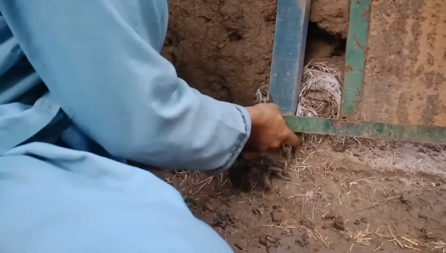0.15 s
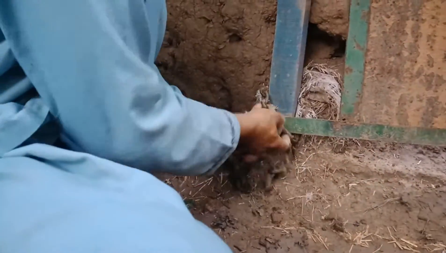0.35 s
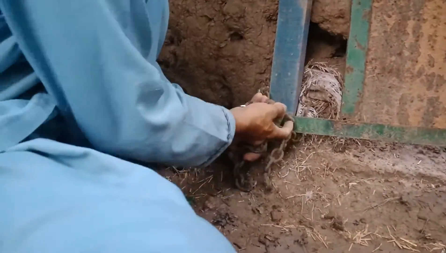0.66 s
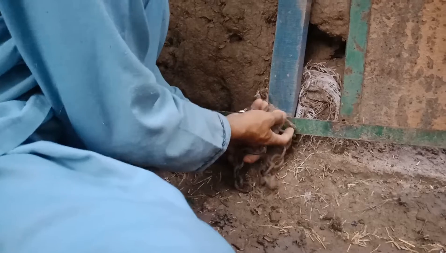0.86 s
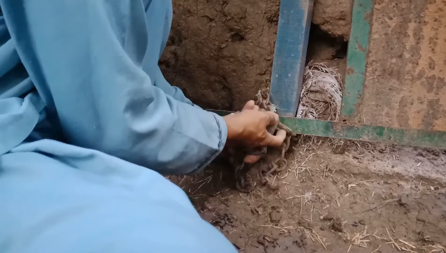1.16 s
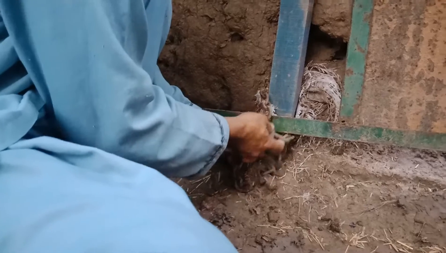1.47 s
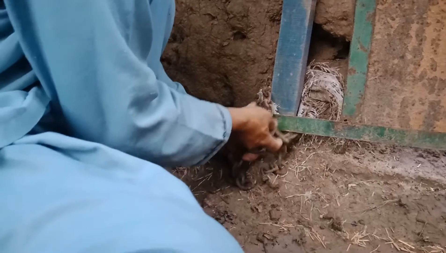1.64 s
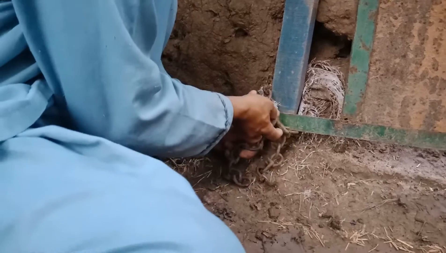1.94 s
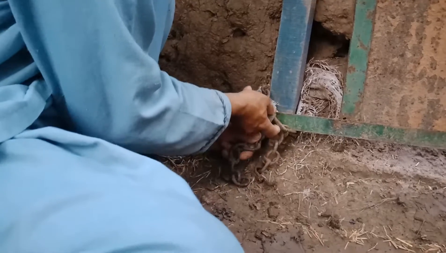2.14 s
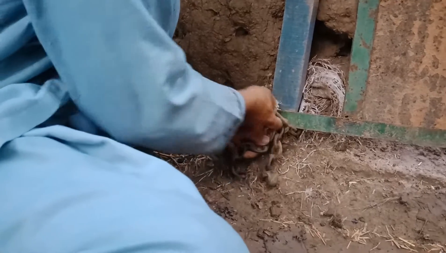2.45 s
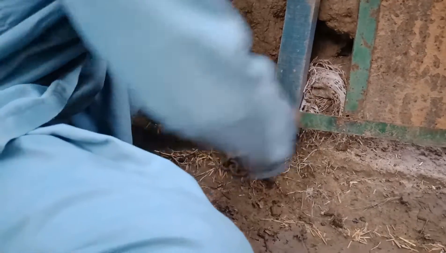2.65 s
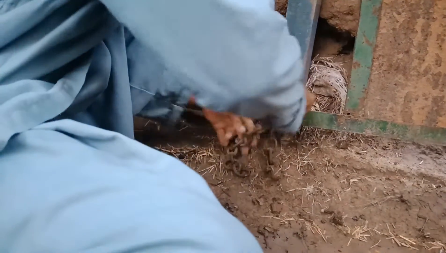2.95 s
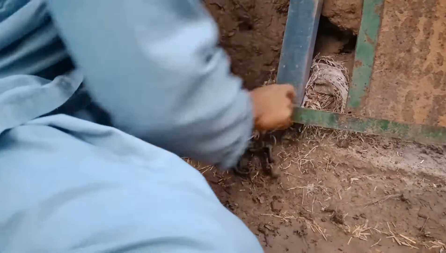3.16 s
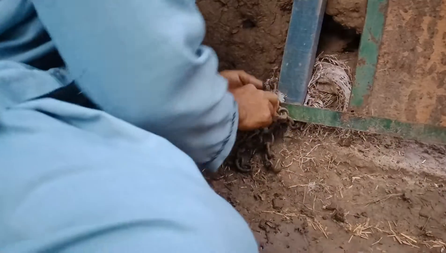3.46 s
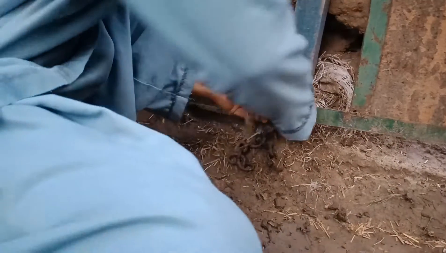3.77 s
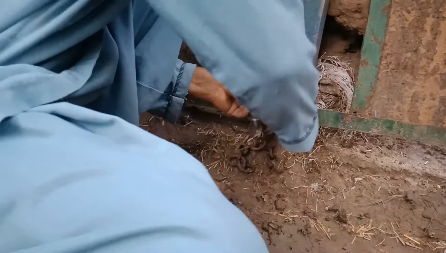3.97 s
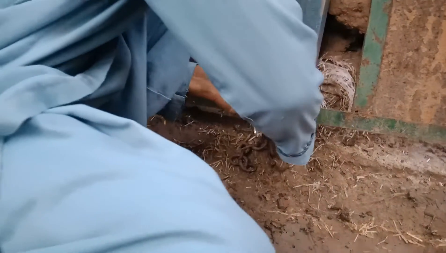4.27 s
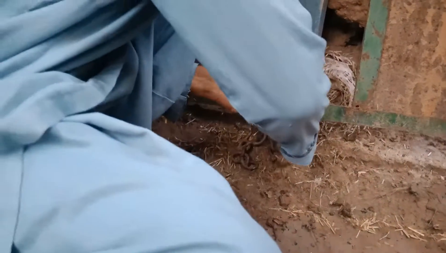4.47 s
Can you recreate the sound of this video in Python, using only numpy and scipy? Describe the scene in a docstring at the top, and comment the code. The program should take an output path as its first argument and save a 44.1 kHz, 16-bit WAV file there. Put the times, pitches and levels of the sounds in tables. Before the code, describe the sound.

Chain links scrape and strike a sheet-metal door frame, each blow ringing short and dull, with small dragging knocks between and a few faint high tinkles. The opening is busy, the middle sparse, then the heaviest clatter comes before activity thins to scattered hits. Steady pulsing crickets lean right behind it in an open yard, with a soft distant hum; near stereo microphone, dry.

```python
"""Hands work an iron chain round the foot of a sheet-metal door in a yard. Links knock the frame, and each blow
excites damped door modes that ring dull and dense. Between blows the dragged chain is a random train of small
knocks into the same modes, and link against link tinkles faintly in a few high modes. Crickets, louder to the
right, are a blur of wing strokes; behind them lie a far motor hum of resonated noise and shaped outdoor air."""
import sys
import numpy as np
from scipy import signal
from scipy.fft import rfft, irfft, next_fast_len
from scipy.io import wavfile
from scipy.ndimage import uniform_filter1d

SR = 44100
rng = np.random.default_rng(int(sys.argv[2]) if len(sys.argv) > 2 else 0)


def generate_wav(sig):
    """Save sig (samples, or channels by samples) to the path in sys.argv[1] as 16-bit PCM at SR."""
    pcm = np.round(np.clip(np.atleast_2d(sig).T, -1, 1) * 32767).astype(np.int16)
    wavfile.write(sys.argv[1], SR, pcm)


N = 203256
TIME = np.arange(N) / SR


def undb(db):
    """Decibel scale: amplitude ratio of a level."""
    return 10 ** (np.asarray(db) / 20)


def read(table, hz):
    """Log-frequency interpolation of a table of (pitch_hz, value)."""
    table_hz, values = np.array(table).T
    return np.interp(np.log(hz), np.log(table_hz), values)


def curves(table):
    """Linear interpolation in time: the columns after start_s, sample by sample."""
    s, *columns = np.transpose(table)
    return [np.interp(TIME, s, column) for column in columns]


def unit(x):
    """Normalization to an RMS of one."""
    return x / np.sqrt(np.mean(x ** 2))


def ring(x, hz, width_hz):
    """Resonance: a second-order peak passes a narrow band of the excitation."""
    b, a = signal.iirpeak(hz, hz / width_hz, SR)
    return signal.lfilter(b, a, x)


def walk(rate):
    """Slow random modulation: random levels held 1 / rate s and smoothed twice."""
    hold = int(SR / rate)
    steps = np.repeat(rng.standard_normal(N // hold + 1), hold)
    return uniform_filter1d(uniform_filter1d(steps, hold), hold)[:N]


def add(out, sound, s):
    """Superposition: mix a sound in from time s."""
    i = int(s * SR)
    out[:, i:i + sound.shape[1]] += sound[:, :N - i]


# spectrum of each of the two noises in the outdoor air: pitch_hz, level_db (per Hz)
AIR_SPECTRUM = [(30, -93), (60, -90), (160, -76), (300, -88), (1000, -101), (4000, -106), (6300, -118),
                (7000, -121), (7600, -112), (8300, -122), (9200, -113), (10500, -118), (15500, -118)]
HUM_HZ, HUM_WIDTH_HZ, HUM_DB = 81.2, 9.2, -56  # the level wavers about HUM_DB


def yard():
    """Spectral shaping and resonance of noise: outdoor air, alike on both sides only in the bass, and motor hum."""
    size = next_fast_len(N, True)
    hz = np.maximum(np.fft.rfftfreq(size, 1 / SR), 1)
    mid, side = rfft(rng.standard_normal((2, size)))
    wide = np.clip(hz / 1500, .25, 1)
    left_right = mid + wide * side * np.array([[1], [-1]])
    air = irfft(undb(read(AIR_SPECTRUM, hz)) * np.sqrt(SR / 2) * left_right, size)[:, :N]
    narrow = ring(rng.standard_normal(N), HUM_HZ, HUM_WIDTH_HZ)
    hum = unit(ring(narrow, HUM_HZ, 33)) * undb(HUM_DB + 3.0 * walk(7))
    return air * undb([[-.3], [.3]]) + hum * undb([[-1.1], [1.1]])


# swells of the cricket chorus, added to the bed: crest_s, level_db, left_minus_right_db
SWELLS = [(.07, -39.5, -9), (.63, -39.5, -9.5), (1.3, -41, -7), (1.88, -39.5, -8.5), (2.501, -41, -8.5),
          (3.03, -41.5, -9.5), (3.62, -42.5, -8.5), (4.328, -41, -10.5), (4.68, -43, -9)]
SWELL_RISE_S, SWELL_FALL_S = 0.11, 0.17
BED_DB, BED_GROWS_DB_PER_S, BED_PAN_DB = -50, 1.15, -10  # singers that never pause; pan is left minus right


def swells():
    """Power summation: quick rises and slower falls of the chorus, left and right, over a slowly growing bed."""
    side = np.array([[.5], [-.5]])
    power = undb(BED_DB + BED_GROWS_DB_PER_S * TIME + side * BED_PAN_DB) ** 2
    for s, db, pan_db in SWELLS:
        width_s = np.where(TIME < s, SWELL_RISE_S, SWELL_FALL_S)
        shape = np.exp(-((TIME - s) / width_s) ** 2)
        power = power + shape * undb(db + side * pan_db) ** 2
    return power


# resonances of the wings: pitch_hz (before the left-right shift), stroke_s (from peak to 1/e),
# level_db (between wings)
WINGS = [(4760, 0.0017, -7), (5156, 0.0011, 12.5), (5318, 0.0016, 5), (5560, 0.0014, -1.5)]


def crickets(rate=4000, throb_db=-0.43):
    """Stochastic superposition: random wing strokes blur, unrelated left and right, and throb a little."""
    t, out = TIME[:600] - TIME[300], []
    for side, power in zip((1, -1), swells()):
        song = 0
        for hz, stroke, wing_db in WINGS:
            strokes = (rng.random(N) < rate / SR) * rng.standard_normal(N)
            shifted_hz = hz * (1 + 0.0047 * side)  # the left singers sit higher
            burst = np.exp(-(t / stroke) ** 2) * np.sin(2 * np.pi * shifted_hz * t)
            song = song + undb(wing_db) * signal.oaconvolve(strokes, burst, "same")
        out.append(unit(song) * np.sqrt(power) * undb(throb_db * walk(45)))
    return np.array(out)


# touches of link on link: start_s, level_db (before the mode levels), upper_db (added above the lowest mode)
TINKS = [(.131, -76, -2), (.204, -70, -4), (.247, -64, -6), (.633, -52, -7), (3.688, -66, -2),
         (3.71, -70, 4), (3.722, -66, 4), (3.765, -74, 2)]
# modes of a free link: pitch_hz (before detuning), level_db (between modes), t60_s
LINK_MODES = [(7960, 20, 0.07), (9800, -3, 0.07), (10950, 0.5, 0.14), (14900, -8, .12)]


def tinks():
    """Free vibration of small bodies: two links touch and ring in a few high, slightly detuned modes."""
    out, t = np.zeros((2, N)), TIME[:SR // 4]
    lowest_hz = LINK_MODES[0][0]
    for s, db, upper_db in TINKS:
        sound = 0
        scatter = rng.standard_normal((len(LINK_MODES), 2, 1))
        for (hz, mode_db, t60), z in zip(LINK_MODES, scatter):
            size = undb(db + mode_db + upper_db * (hz > lowest_hz) + 3.6 * z[::-1])
            wave = np.sin(2 * np.pi * hz * (1 + 0.0047 * z[0]) * t + z)
            sound = sound + size * wave * np.exp(-np.log(1000) * t / t60)
        add(out, sound * (1 - np.exp(-t / 0.008)), s)
    return out * undb(5.3 * walk(120))  # random level swings make the tinkling ragged


# strong modes of the door: pitch_hz, level_db (before DOOR_DB), t60_s (before the hand's damping)
DOOR_MODES = [(215.3, 10.5, 0.15), (439.5, -2, 0.25), (515, -6, 1.1), (638, -10, .3), (775.4, 3.5, 0.082),
              (871, -6, 0.12), (1015, -12, .45), (1255, -11, .35), (1321, -5.5, 0.31), (1368, -18, 1.2),
              (1520, -10.5, 0.32), (1730, -5, 0.21), (1840, -12, .3), (2261, -21, .8), (2410, -6, 0.12),
              (2503, -12, .4), (2685, -6, 0.17), (2850, -11, .1), (3025, -12, .2), (3260, -8, 0.17),
              (3336, -6, 0.13), (3490, -10, .22), (3610, -5.5, 0.19), (3830, -10, .2), (4016, -7, 0.15),
              (4200, -11, .12)]
# decay of the dense sheet modes: pitch_hz, t60_s (before scatter and the hand's damping)
SHEET_T60 = [(150, 1), (400, 1), (1000, 0.54), (2500, 0.35), (5000, 0.15), (8000, 0.079)]
# strength of the dense sheet modes: pitch_hz, level_db (relative)
SHEET_LEVEL = [(130, -1), (220, 3.5), (450, -1.5), (800, 0.5), (1500, 2.5), (2600, -2.5), (4200, 1.5),
               (5200, -8), (6500, -17.5), (7800, -26)]
DOOR_DB = 15  # lift of the strong modes
WAVER_PER_S, WAVER_DB, WAVER_RAD = 70, 4, 1.1  # full depths, per unit of random draw
WAVER_GROWS_S, WAVER_FULL_HZ = .025, 1500  # lower modes waver less


def door_modes(count=280):
    """Modal superposition: frequency, gain and free ringing (sine rows, then cosine rows) of strong and sheet modes."""
    strong_hz, strong_db, strong_t60 = np.array(DOOR_MODES).T
    strong = len(DOOR_MODES)
    sheet_hz = 110 + 7300 * ((np.arange(count) + rng.random(count)) / count) ** 1.7
    sheet_t60 = read(SHEET_T60, sheet_hz) * undb(1.6 * rng.standard_normal(count))
    hz = np.r_[strong_hz, sheet_hz]
    gain = undb(np.r_[strong_db + DOOR_DB, read(SHEET_LEVEL, sheet_hz)])
    t60 = np.r_[strong_t60, sheet_t60]
    t = np.float32(TIME[:int(.4 * SR)])
    cycles = np.outer(np.float32(hz), t)
    # each mode builds up over 2.2 cycles, slowest in the bass, as the bending wave spreads
    build_up = np.minimum(cycles / np.float32(2.2), 1)
    fade = np.exp(np.outer(np.float32(-np.log(1000) / t60), t)) * build_up
    turn = np.float32(2 * np.pi) * (cycles % 1)
    # each strong mode wavers randomly in level and phase, alike in every blow
    nodes = rng.standard_normal((2, strong, int(t[-1] * WAVER_PER_S) + 2))
    waver = np.float32([[np.interp(t * WAVER_PER_S, np.arange(len(z)), z) for z in part] for part in nodes])
    waver *= np.minimum(t / np.float32(WAVER_GROWS_S), 1)
    waver *= np.float32(np.minimum(strong_hz[:, None] / WAVER_FULL_HZ, 1))
    fade[:strong] *= np.float32(undb(WAVER_DB * (waver[0] - .3)))
    turn[:strong] += np.float32(WAVER_RAD) * waver[1]
    return hz, gain, np.concatenate([fade * np.sin(turn), fade * np.cos(turn)])


def strike(hz, gain, scatter_db=2.5, alike_hz=1100):
    """Modal excitation at one contact point: stereo mode strengths, whose phases agree only in the bass."""
    z = rng.standard_normal((3, len(hz)))
    apart = np.minimum(hz / alike_hz, 1.3) * (.5 + 0.48 * z[2])
    turn = 3 * z[1] + np.array([[1], [-1]]) * apart
    size = gain * undb(scatter_db * z[0])
    return np.float32(np.c_[size * np.cos(turn), size * np.sin(turn)])


def band_shares(hz, bands_hz):
    """Band partition: how much each mode belongs to each band, on a log-frequency axis."""
    return np.float32([np.interp(np.log(hz), np.log(bands_hz), row) for row in np.eye(len(bands_hz))])


# chain dragging on the frame: start_s, level_db (before colour and random swing), brightness_db (treble up, bass down)
DRAG = [(0.0, -41, 6), (0.31, -49, -2.5), (0.67, -43, 3.5), (1.08, -62.5, 3.5), (1.49, -60.5, 2),
        (1.8, -53, 4), (2.07, -54.5, 1.5), (2.3, -61, 5.5), (2.49, -42.5, 5.5), (2.63, -38, 7),
        (2.72, -37, -2.5), (3.04, -50.5, 2.5), (3.49, -53.5, 3), (3.63, -55, 2), (4.18, -63, 7),
        (4.41, -46.5, 2), (4.61, -62.5, -0.5)]
# centres of the bass, middle and treble bands: pitch_hz
DRAG_BANDS_HZ = (280, 900, 2600)
# bass, middle and treble: level_db (over the mean level), swing (share of the level's departure from the mean)
DRAG_COLOUR = [(-1, 0.67), (-4, 1.13), (-7, 0.62)]
DRAG_MEAN_DB = -52


def drag(hz, gain, free, rate=600, spread_db=1.5):
    """Random impulse excitation: many small knocks of dragged links are convolved with the door's response."""
    signs = rng.choice([-1, 1], N)
    knocks = (rng.random(N) < rate / SR) * undb(spread_db * rng.exponential(size=N)) * signs
    # light knocks under the hand hardly wake the strong modes
    soft = np.minimum(gain, undb(read(SHEET_LEVEL, hz)))
    short, damping = free[:, :4096], undb(-420 * TIME[:4096])
    level_db, bright_db = curves(DRAG)
    out = 0
    for share, (over_db, swing), lean in zip(band_shares(hz, DRAG_BANDS_HZ), DRAG_COLOUR, (-1, 0, 1)):
        db = DRAG_MEAN_DB + over_db + swing * (level_db - DRAG_MEAN_DB) + lean * bright_db
        door = strike(hz, soft * share) @ short * damping
        rub = unit(signal.oaconvolve(door, [knocks], axes=1)[:, :N])
        out = out + rub * undb(db + 4.8 * walk(24.93))
    return out * undb([[-1.2], [1.2]])


# blows on the frame: start_s, thud_db, ring_db, clink_db, tick_db (relative band levels), build_up_s (two time
# constants), one or more favoured_hz (modes favoured by the contact), lift_db (of those modes)
BLOWS = [(.002, -46, -41, -51, -57, 0.002, 1321, 5),
         (.043, -35, -41, -28, -28, 0.0017, 3025, 4200, 2850, 6),
         (.078, -37, -35.5, -32.5, -32.5, 0.0021, 760, 223, 2.9),
         (.187, -41, -46, -59, -65, 0.004, 780, 225, 15),
         (.228, -63, -41.5, -49.5, -55, 0.0028, 1500, 1310, 3), (.308, -58, -53, -66, -66, .008, 790, 18),
         (0.417, -53, -50, -76, -70, 0.003, 858, 1015, 19),
         (.457, -51, -48, -53, -52, 0.027, 217, 1740, 1.2),
         (.484, -71, -39, -44.5, -76, .012, 774, 2460, 11),
         (.547, -45, -29.5, -25.5, -56, 0.008, 3257, 764, 1520, 2690, 3500, 1260, 7.5),
         (.66, -60, -52, -42, -62, .01, 3490, 3025, 6), (.708, -52, -60, -48, -44, 0.001, 4200, 510, 10),
         (.755, -40, -47, -81, -65, 0.039, 216, 10.4), (.783, -32, -43, -43.5, -44, 0.02, 779, 222.9, 18),
         (1.049, -43.5, -46, -37, -50, 0.029, 1500, 1310, 8.5), (1.176, -58, -54, -54, -62, .004, 1500, 6),
         (1.559, -52.5, -47.5, -63, -55, 0.045, 750, 860, 3), (1.627, -58, -54, -54, -64, .004, 860, 6),
         (1.729, -56, -54, -58, -66, .004, 640, 6),
         (1.791, -42, -29, -21, -43, 0.012, 2690, 510, 3330, 1370, 2261, 3830, 4016, 10),
         (2.256, -44, -49.5, -47, -57, 0.015, 1500, 1310, 8),
         (2.446, -35.5, -41, -40, -66, 0.022, 780, 221, 6.9),
         (2.5, -26.5, -21.5, -19.5, -28, 0.006, 770, 2430, 1255, 3320, 3830, 9.5),
         (2.547, -36, -39, -36, -55, 0.015, 1310, 5), (2.575, -30, -37, -44, -60, .012, 215, 440, 638, 5),
         (2.65, -35, -42, -48, -62, .01, 215, 3), (2.724, -28, -26, -25, -27.5, 0.006, 215, 4),
         (2.735, -21, -22, -17, -47.5, 0.012, 1728, 450, 775, 12),
         (2.797, -28, -32, -34, -60, .008, 440, 1015, 5), (2.875, -34, -40, -48, -62, .01, 871, 5),
         (2.993, -36.5, -48.5, -52.5, -33, 0.01, 225, 770, 2.6),
         (3.143, -57, -53.5, -45.5, -42, 0.0022, 2690, 4050, 5),
         (3.289, -38.5, -38.5, -35.5, -33, 0.008, 780, 2685, 10),
         (3.332, -52, -50, -52, -66, .008, 1340, 2685, 10),
         (3.445, -39.5, -41, -36, -48, 0.002, 4050, 753, 14), (3.715, -63, -60, -58, -72, .008, 3560, 16),
         (3.811, -48, -50, -54, -70, .01, 2850, 19), (4.045, -66, -64, -54, -70, .02, 3600, 2850, 8),
         (4.156, -62, -53, -50, -66, 0.0075, 2850, 18),
         (4.272, -38, -35.5, -46, -59, 0.022, 219, 1320, 7.6),
         (4.291, -32, -33, -26.5, -42, 0.0035, 780, 2410, 1300, 3380, 3700, 4016, 1015, 2685, 9.5),
         (4.536, -47, -52, -51, -64, 0.0088, 770, 1735, 2)]
# centres of the thud, lower ring, upper ring, clink and tick bands: pitch_hz
BLOW_BANDS_HZ = (250, 770, 1500, 3200, 6300)
LOW_RING_DB, LOW_RING_SHARE = 1.5, 0.23  # lower over upper ring, and how far it follows thud minus clink
NEAR_OCTAVES = .047  # reach of the lift around a favoured mode
FIRST_LINK_SHARE = .12  # part of a blow that lands at once
HAND_DB_PER_S, SLACK_DB_PER_S2 = 44, 901.5  # damping by the hand on the chain, less for each s of build-up
BLOW_PAN_DB = -2  # left minus right


def blows(hz, gain, free):
    """Impact excitation and damping: a blow builds up as links pile on the frame; a hand shortens the ring."""
    out, t = np.zeros((2, N)), TIME[:free.shape[1]]
    share = band_shares(hz, BLOW_BANDS_HZ)
    band_db = 10 * np.log10(share @ gain ** 2)
    strong = np.arange(len(hz)) < len(DOOR_MODES)
    strengths = []
    for _, thud, ring_db, clink, tick, _, *favoured_hz, lift_db in BLOWS:
        low_ring = ring_db + LOW_RING_DB + LOW_RING_SHARE * (thud - clink)
        colour = np.array([thud, low_ring, ring_db, clink, tick]) - band_db
        reach = [np.exp(-(np.log2(hz / f) / NEAR_OCTAVES) ** 2) for f in favoured_hz]
        near = strong * np.max(reach, axis=0)
        size = gain * undb(colour @ share + lift_db * near + 3)
        # favoured modes scatter less and are more alike left and right
        strengths.append(strike(hz, size, scatter_db=2.55 * (1 - near), alike_hz=1100 + 4000 * near))
    rings = (np.concatenate(strengths) @ free).reshape(len(BLOWS), 2, -1)
    pan_db = np.array([[BLOW_PAN_DB / 2], [-BLOW_PAN_DB / 2]])
    for (s, _, _, _, _, build_up_s, *_), sound in zip(BLOWS, rings):
        pile = 1 - (1 - FIRST_LINK_SHARE) * np.exp(-2 * t / build_up_s)
        crack = 1 + 0.17 * np.exp(-t / 0.0016)  # dies much faster than the ring
        hand_db = (HAND_DB_PER_S - SLACK_DB_PER_S2 * build_up_s) * t
        add(out, sound * pile * crack * undb(pan_db - hand_db), s)
    # a slight random unevenness in level roughens all the blows
    return out * undb(1.02 * walk(160))


def scene():
    """Superposition of the yard, the crickets and the chain; drag and blows share one set of door modes."""
    door = door_modes()
    return yard() + crickets() + tinks() + drag(*door) + blows(*door)


TOP_HZ = 15500


def record(dry):
    """Band limiting: the phone cuts the top with a steep elliptic low-pass."""
    return signal.sosfilt(signal.ellip(10, .2, 60, TOP_HZ, fs=SR, output="sos"), dry)


dry = scene()
out = record(dry)
generate_wav(out)
```